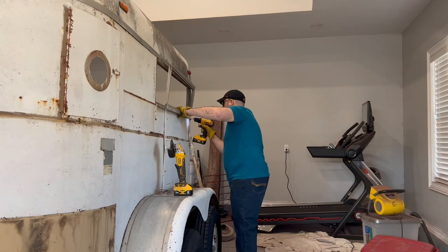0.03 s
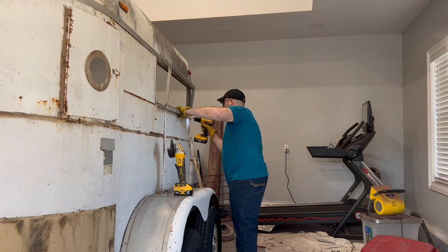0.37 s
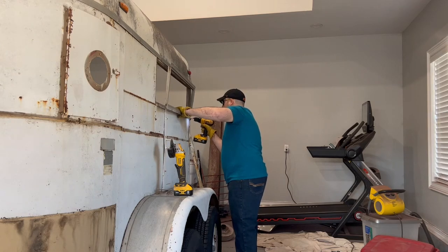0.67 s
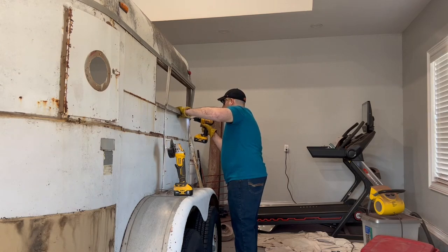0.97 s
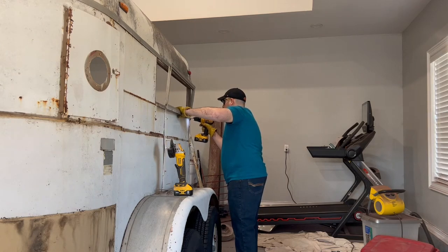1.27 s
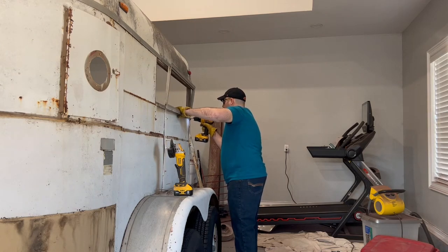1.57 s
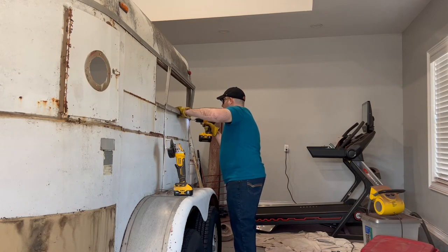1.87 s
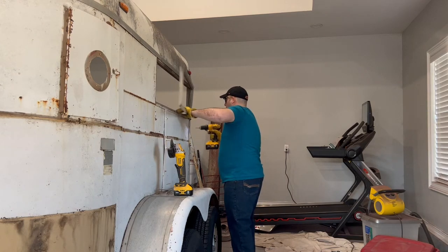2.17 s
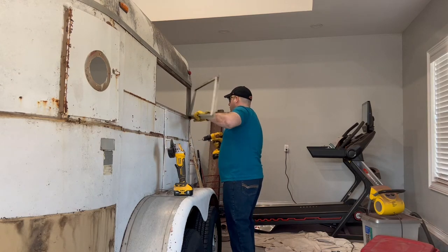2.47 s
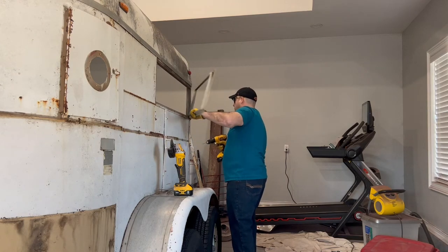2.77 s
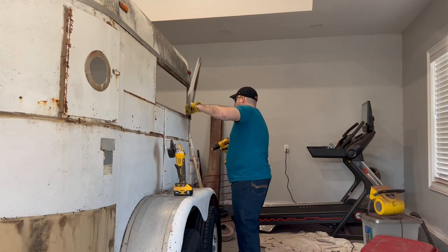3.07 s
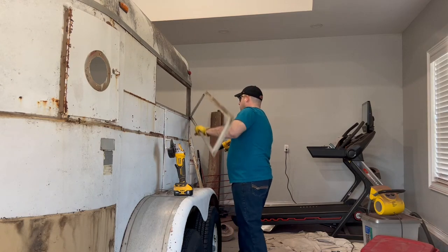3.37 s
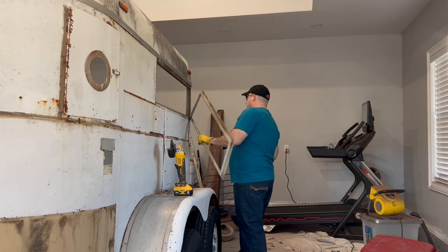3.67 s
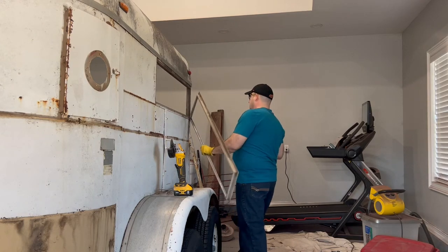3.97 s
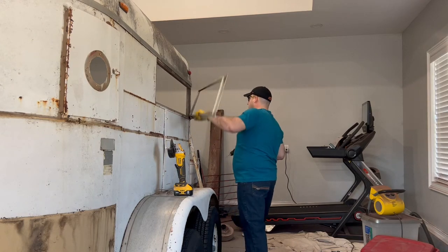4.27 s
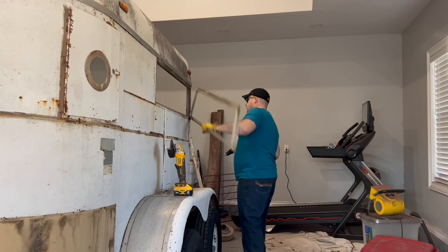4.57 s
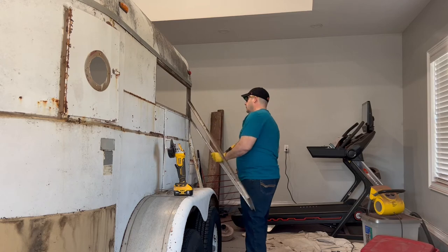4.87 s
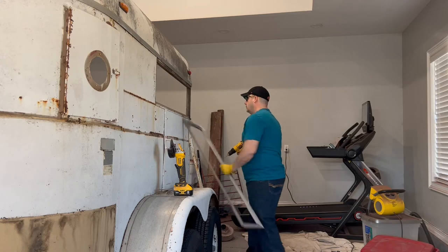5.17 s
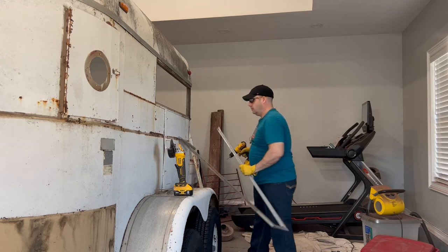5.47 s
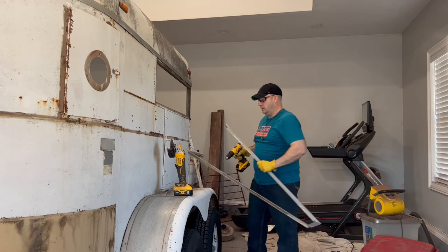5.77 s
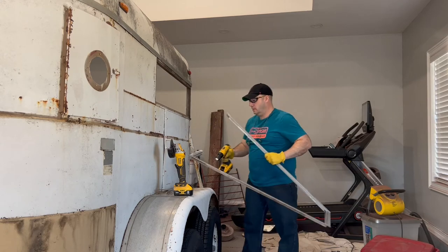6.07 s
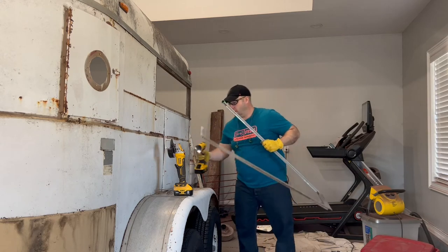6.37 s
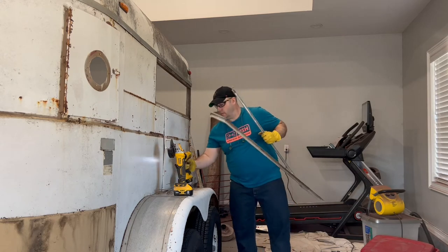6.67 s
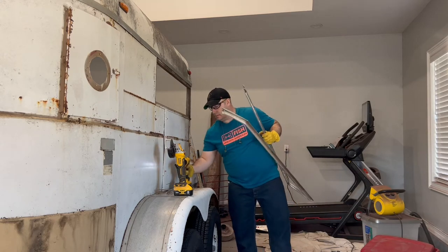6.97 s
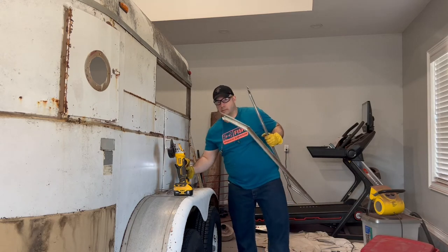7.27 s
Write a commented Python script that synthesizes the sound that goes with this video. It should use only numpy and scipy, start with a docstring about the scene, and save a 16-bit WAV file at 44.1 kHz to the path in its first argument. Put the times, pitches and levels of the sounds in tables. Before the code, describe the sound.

Four quick drill bursts, then metal trim is pulled off with knocks, scrapes, a clank and a crash, ending with a hollow thud.

```python
"""In a bare, echoing garage a cordless drill runs in four short bursts: its gears rattle, its motor
whines and its bit shakes a trailer's metal skin while grinding out a rivet. From about 2 s a thin metal
window frame is worked loose; impacts make it tick and thump, and friction makes it scrape. Near 4 s it
springs free with a clank, and a second later it crashes against the wall. Near 7 s the drill is stood
on the fender, whose modes answer with a hollow thud. Faint room air and electrical whistles persist."""
import sys
import numpy as np
from scipy import signal
from scipy.fft import rfft, irfft, next_fast_len
from scipy.io import wavfile
from scipy.ndimage import uniform_filter1d

SR = 44100
rng = np.random.default_rng(int(sys.argv[2]) if len(sys.argv) > 2 else 0)


def dump(signal):
    """Clip the signal to [-1, 1] and save it as 16-bit WAV at the path in sys.argv[1]."""
    limited = np.clip(np.atleast_2d(signal).T, -1, 1)
    pcm = np.round(limited * 32767).astype(np.int16)
    wavfile.write(sys.argv[1], SR, pcm)


N = 328104
T = np.arange(N) / SR

# Trigger pulls. Each row: start in seconds, time held in seconds, relative motor speed,
# relative level of the skin's rattle in dB.
TRIGGER_PULLS = [(.287, 0.1969, 0.99, -39), (0.677, 0.1626, 1.04, -36.5), (1.011, .19, 1.1, -37.5),
                 (1.368, 0.2049, 1.0, -38)]
# Knocks of the frame. Each row: start in seconds, frame level in dB, edge tick level in dB,
# tick pitch in Hz, chatter time in seconds.
FRAME_KNOCKS = [(1.942, -45.5, -29, 7000, 0.0278), (2.045, -30.5, -33, 8030, .05),
                (2.059, -24.5, -19, 7500, 0.0456), (2.087, -25.5, -24, 7936, 0.031),
                (2.112, -11.5, -12.5, 8400, 0.038), (2.29, -22.5, -27, 8900, 0.03),
                (2.544, -23, -19, 4140, 0.069), (2.77, -26.5, -22.5, 3200, 0.069),
                (2.877, -21, -16.5, 8200, 0.099), (2.949, -20, -17.5, 9550, 0.022),
                (3.14, -26, -24, 5510, 0.0405), (3.274, -33.5, -28.5, 4509, 0.045),
                (3.446, -23.5, -16.5, 7894, 0.063), (3.471, -28, -21.5, 3500, 0.049),
                (3.712, -19.5, -13, 12500, 0.0626), (3.771, -19.5, -20, 6050, 0.12),
                (3.942, -28, -25.5, 7486, 0.102), (4.034, -32, -27.5, 4622, 0.034),
                (4.597, -31, -17.5, 8000, .047), (4.63, -18.5, -29.5, 2910, 0.05),
                (4.885, -23, -18, 8000, 0.0265), (4.985, -15.5, -19, 8500, 0.0405),
                (5.062, -11, -13.5, 7509, 0.068), (5.117, 6, -9, 5698, 0.0484),
                (5.208, 0.5, 2, 8680, 0.0092), (5.602, -17, -15, 7690, 0.0229),
                (5.994, -29, -37, 3500, 0.1), (6.036, -32.5, -38, 2197, 0.0487)]
# Slides of the frame along the opening. Each row: start in seconds, length in seconds,
# relative scrape level in dB, relative wall rumble level in dB.
FRAME_SLIDES = [(2.239, .24, -72, -56), (2.603, 0.233, -65, -64.5), (2.895, 0.158, -66.5, -54.5),
                (3.136, 0.181, -62.5, -58.5), (3.448, 0.0713, -53.5, -67), (3.708, 0.124, -52, -69),
                (3.938, 0.123, -61.5, -68), (4.609, 0.136, -39.5, -51.5), (4.784, 0.036, -47, -47.5),
                (4.946, 0.27, -48, -67), (5.21, 0.263, -46.5, -50), (5.879, 0.175, -81, -66),
                (6.26, 0.19, -78.5, -80.5)]
# Impacts. Each row: start in seconds, level in dB, chatter time in seconds.
SEAT_BUMPS = [(2.118, -4, .02), (2.150, -6.5, .053), (2.225, -12.5, .013), (2.591, -22, .04),
              (2.949, -17.5, .04), (3.06, -27.5, .031), (4.66, -17.5, .08), (4.73, -23.5, .08)]  # the frame bumps the skin around its seat
RELEASE_CLANKS = [(4.073, 6.5, 0.011), (4.087, -4, 0.0095), (4.144, -3, 0.023)]  # the frame springs off the last rivet
FENDER_LANDINGS = [(6.856, -22.5, .018), (6.894, 4, 0.0174), (6.913, -0.5, 0.0218), (6.997, -2, 0.031),
                   (7.041, -13, 0.026), (7.10, -20.5, 0.0306), (7.177, -13.5, 0.0194)]  # the drill lands and rocks

# Broad spectra. Each row: frequency in Hz, relative spectral density in dB.
GEAR_SPECTRUM = [(300, 5), (1000, 10.5), (2200, 0.5), (3000, -1), (4700, 1.5), (6200, -5.5), (7800, -8),
                 (8800, -7), (9800, -9), (12000, -15), (15500, -28)]
RASP_SPECTRUM = [(2000, -17.5), (6000, -2.5), (7800, -2), (8800, 3), (9800, -5.5), (12000, -9),
                 (15500, -15.5)]  # dry rasp of the gear teeth
SKIN_SPECTRUM = [(28, -32.5), (43, -6), (62, -35), (86, 1.5), (105, -6.5), (145, 3), (205, -6), (280, 3),
                 (450, -5), (750, -6.5), (1200, -22), (2000, -13.5), (5000, -41.5)]  # the skin's response to the bit
FRAME_SPECTRUM = [(150, -28), (600, -10.5), (1200, -6), (2100, -1), (3000, -7), (4500, -9), (7000, -17.5),
                  (10000, -28.5), (15000, -28.5)]
EDGE_SPECTRUM = [(500, -29), (1800, -11.5), (3000, 0), (4300, 0), (5500, -0.5), (8700, -1), (10000, -5.5),
                 (15500, -15)]  # the edge of the frame that touches
WALL_SPECTRUM = [(25, -25.5), (45, -8.5), (70, -6.5), (125, -4), (165, -4.5), (240, 2.5), (400, -4),
                 (650, -7), (1000, -18), (2000, -21.5), (6000, -43)]
SEAT_SPECTRUM = [(50, -11), (140, -13.5), (250, 0.5), (420, -6), (700, -7), (1100, -10), (1600, -22),
                 (3000, -30), (8000, -45.5)]  # the skin around the window
BENT_FRAME_SPECTRUM = [(60, -32), (200, -15.5), (290, -9), (450, -13), (680, -15.5), (820, -10), (1200, -6),
                       (1550, -4.5), (2300, -13), (4000, -18.5), (7600, -16), (10000, -23), (15500, -31.5)]
SCRAPE_SPECTRUM = [(120, -9), (400, 2), (850, 5), (1200, -0.5), (1900, -1.5), (3000, -5.5), (5500, -5.5),
                   (8800, -7), (11000, -17.5), (15500, -23)]
FENDER_SPECTRUM = [(25, -14.5), (60, -13.5), (130, -5), (210, -3.5), (420, 1), (700, -6.5), (1300, -11),
                   (2400, -20.5), (4500, -25.5), (8500, -30.5), (11000, -44.5), (15500, -53.5)]
AIR_SPECTRUM = [(12, -37), (20, -14), (45, -9), (86, -10.5), (123, -5.5), (146, -18), (234, -17),
                (388, -31.5), (472, -24), (825, -33.5), (1810, -35), (6910, -44), (7520, -43), (13000, -48),
                (16000, -57)]  # still air of the room

# Heavily damped resonances. Each row: centre in Hz, width in Hz, lift in dB at a depth of one.
GEARBOX_PEAKS = [(665.5, 21.8, 9), (871, 55, 3.2), (1589, 120, 3.94), (2487, 114, 3.9), (2900, 326, 4.1),
                 (3610, 250, 3.7), (4435, 203, 3.33), (4840, 98, 4.8), (5280, 224, 4.2), (5530, 106, 3.7),
                 (5830, 147, 2.4), (6700, 93, 1.6), (7230, 150, 6.9), (8650, 176, 5.2), (8710, 106, 6),
                 (10100, 184, 3.0)]
FRAME_PEAKS = [(904, 130, 2.5), (1460, 72, 5), (1813, 200, 3), (1994, 39, 0.5), (2269, 105, 4),
               (2525, 41, 5), (3050, 270, 4), (3466, 120, 3.5), (3917, 132, 1.5), (3804, 41, 3.5),
               (4408, 110, 2.5), (4976, 125, 5.5), (5660, 85, 6), (5960, 64, 3), (6305, 70, 4),
               (6693, 72, 1.5), (7560, 166, 3.5), (8542, 170, 3), (8910, 148, 3), (9523, 107, 3),
               (10614, 73, 2), (11280, 149, 4)]
BENT_FRAME_PEAKS = [(807, 55, 4.5), (1210, 140, 4.8), (1538, 230, 4.3), (1717, 54, 5.4), (2860, 139, 3.4),
                    (3130, 143, 4.8), (3660, 161, 4.6), (4250, 100, 5.2), (5100, 200, 3.2),
                    (5890, 180, 3.8), (6761, 166, 4.3), (7270, 156, 4.1), (7860, 200, 4.2),
                    (8450, 192, 5.3)]

# Prominent normal modes. Each row: frequency in Hz, relative level in dB, 60 dB decay time in seconds.
SKIN_MODES = [(138, -25.5, 0.42), (169, -5.5, 0.42), (315.1, -2, 0.138), (561, -10, 0.324), (672, 9, 0.32),
              (797.3, 5, 0.091)]
FRAME_MODES = [(891, -4.5, 0.45), (1007.6, -3.5, .6), (1343, -0.5, 0.745), (1744, 3, 1), (1850, -4.5, 0.35),
               (2277, -1.5, .5), (2670, 3, .7), (3890, -7, 0.37), (4140, -9, .5), (4700, -25.5, .6),
               (5180, -7.5, .6), (6165, -13, .7), (7560, -15, .3), (8380, -12.5, .3)]
WALL_MODES = [(233.3, -7, 1.0), (250.3, 2.5, 0.83), (270.2, 5, .8), (303, -6, 0.64), (397.6, -8, 0.7),
              (496.3, -5, 0.79), (577.7, -4, .4), (695.3, -7.5, 0.46)]
SEAT_MODES = [(241, -6.5, 0.59), (394.4, 3, 0.977), (398.9, 1, 0.22), (488.2, -4, 1), (663.3, -12, 0.44),
              (786, -6, .6), (1524, -10.5, 0.15)]
BENT_FRAME_MODES = [(815, -6.5, 0.98), (1189, -7, 0.48), (1332.3, -13, .2), (1432, -8.5, .2),
                    (1539, -7, .3), (1650, -4, 0.29), (3660, -18, .2), (7170, -10, .15)]
FENDER_MODES = [(139.2, -1.5, 0.45), (216.5, 3, 0.39), (229.9, 9.5, 0.16), (322, -10, 0.33),
                (400.2, -5, 0.27), (460, -13.5, .4), (1010, -19, .4), (1080, -21.5, 0.26), (1415, -10, .4)]

# Reverberation of the garage. Each row: frequency in Hz, 60 dB decay time in seconds.
GARAGE_DECAY = [(60, 2.5), (250, 1.31), (600, 1.213), (1500, 1.016), (4000, 0.88), (8000, 0.614),
                (14000, 0.462)]
# Faint electrical whistles. Each row: frequency in Hz, level in dB.
ELECTRICAL_TONES = [(3058, -96.5), (8947, -103), (9830, -107)]


def drill(rotor_hz=108, throb=0.315, gears_db=-39, grind_db=-3, hum_hz=84.75, hum_db=-14, buzz_db=-13):
    """Forced vibration: tooth and chip impacts, modulated by the rotor, drive the gearbox and skin."""
    speed, bite = motor()
    angle = 2 * np.pi * np.cumsum(rotor_hz * np.sqrt(speed)) / SR
    load = 1 + throb * np.cos(angle) + throb * np.cos(2 * angle)
    teeth = grains(per_s=5000, spread_db=3) * load
    gears = unit_power(colour(teeth, peaked(GEAR_SPECTRUM, GEARBOX_PEAKS, depth=1.34)))
    chips = grains(per_s=1500, spread_db=2.5) * load
    buzz = from_db(buzz_db) * unit_power(convolve(chips, ringing(SKIN_MODES)))
    skin = unit_power(colour(chips, SKIN_SPECTRUM)) + buzz
    hum = from_db(hum_db) * np.sin(2 * np.pi * hum_hz * T)  # a low panel mode under the bit
    return from_db(gears_db) * speed * gears + from_db(grind_db) * bite * (skin + hum)


def motor(spin_up_s=0.075, coast_s=0.065, stall_speed=0.070716, bite_exponent=0.673):
    """First-order lag: speed builds on a pull, then friction stops it; bite follows by a power law."""
    speed, bite = np.zeros(N), np.zeros(N)
    for start, held, top_speed, bite_db in TRIGGER_PULLS:
        spun_up = 1 - np.exp(-np.clip(T - start, 0, held) / spin_up_s)
        coasting = np.exp(-np.maximum(T - start - held, 0) / coast_s)
        turning = spun_up * np.maximum((1 + stall_speed) * coasting - stall_speed, 0)
        speed += top_speed * turning
        bite += from_db(bite_db) * turning ** bite_exponent
    return speed, bite


def gear_rasp(level_db=-44, lead_s=0.021):
    """Tooth contact noise grows with torque, which follows both speed and acceleration."""
    speed, _ = motor()
    acceleration = uniform_filter1d(np.gradient(speed) * SR, size=200)
    torque = np.maximum(speed + lead_s * acceleration, 0)
    teeth = grains(per_s=3500, spread_db=3.5)
    return from_db(level_db) * torque * unit_power(colour(teeth, RASP_SPECTRUM))


def motor_whine(start_hz=3200, rise_hz=1160, full_speed=0.85, waver=0.00672, level_db=-49,
                lower_ratio=0.83, lower_db=-5, chirp_hz=3950, chirp_db=-50, chirp_s=0.0256):
    """Rotation tones climb with speed and level off; the first pull opens with a short chirp."""
    speed, _ = motor()
    pitch = (start_hz + rise_hz * np.minimum(speed / full_speed, 1)) * (1 + waver * wander(200))
    phase = 2 * np.pi * np.cumsum(pitch) / SR
    tones = np.sin(phase) + from_db(lower_db) * np.sin(lower_ratio * phase)
    chirp_swell = np.sin(np.pi * np.clip((T - TRIGGER_PULLS[0][0]) / chirp_s, 0, 1))
    chirp = from_db(chirp_db) * chirp_swell * np.sin(2 * np.pi * chirp_hz * T)
    return from_db(level_db) * np.sqrt(speed) * tones + chirp


def frame_knocks(tick_lift_db=4.5, tick_octaves=0.2, wall_share_db=-3.5, wall_growth=1.238):
    """Impact excitation: frame and edge ring; harder knocks start faster and shake the wall more."""
    out = np.zeros(N)
    frame_spectrum = peaked(FRAME_SPECTRUM, FRAME_PEAKS, depth=0.58)
    hz, edge_shape = peaked(EDGE_SPECTRUM, FRAME_PEAKS, depth=0.71).T
    for start, frame_db, edge_db, tick_hz, chatter_s in FRAME_KNOCKS:
        lift = tick_lift_db * np.exp(-(np.log2(hz / tick_hz) / tick_octaves) ** 2)
        edge_spectrum = np.column_stack([hz, edge_shape + lift])
        softness = np.interp(frame_db, [-18, 0], [0.91, 0.47])  # light knocks slide in
        thud = impact(WALL_SPECTRUM, chatter_s, wash_t60=0.4, wash_db=1, modes=WALL_MODES, modes_db=-6.5)
        ring = impact(frame_spectrum, chatter_s, wash_t60=0.11, wash_db=-0.5,
                      modes=FRAME_MODES, modes_db=-15, softness=softness)
        tick = impact(edge_spectrum, chatter_s, wash_t60=0.086, wash_db=-6, softness=softness)
        add(out, start, from_db(wall_share_db + wall_growth * frame_db) * thud)
        add(out, start, from_db(frame_db) * ring)
        add(out, start, from_db(edge_db) * tick)
    return out


def release_clank():
    """Sudden release of strain: the bent frame lets go and vibrates freely."""
    spectrum = peaked(BENT_FRAME_SPECTRUM, BENT_FRAME_PEAKS, depth=0.94)
    return impacts(RELEASE_CLANKS, spectrum, wash_t60=0.07, wash_db=4.5,
                   modes=BENT_FRAME_MODES, modes_db=-14.5)


def corner_crack(start=5.2083, level_db=-1, chatter_s=0.0068):
    """A brief contact has a wide spectrum: a corner of the falling frame cracks against metal."""
    bright = [(1150, -25), (2300, 0), (6000, -3), (12000, -3), (15500, 0)]  # Hz, dB
    return impacts([(start, level_db, chatter_s)], bright, wash_t60=0.026, wash_db=-16)


def seat_thumps():
    """Panel resonance: the skin around the window thumps as the frame comes unstuck."""
    return impacts(SEAT_BUMPS, SEAT_SPECTRUM, wash_t60=0.15, wash_db=5, modes=SEAT_MODES, modes_db=-1.5)


def fender_thud():
    """Shell resonance: the drill's battery lands heel first and rocks on the hollow fender."""
    return impacts(FENDER_LANDINGS, FENDER_SPECTRUM, wash_t60=0.182, wash_db=3.5,
                   modes=FENDER_MODES, modes_db=-6, softness=0.369)


def frame_scrape(scrape_db=5, rumble_db=-2, clump_db=2, attack_s=0.026, release_s=0.032):
    """Stick-slip friction: clumps of tiny slips ring the sliding frame while the wall rumbles."""
    rub = np.zeros(N)
    shake = from_db(-55.5) * decay(t60=0.344, size=N)  # the wall is still settling at the start
    for start, length, rub_db, wall_db in FRAME_SLIDES:
        swell = np.clip((T - start) / attack_s, 0, 1)
        pressure = swell * np.exp(-np.maximum(T - start - length, 0) / release_s)
        rub += from_db(rub_db) * pressure
        shake += from_db(wall_db) * pressure
    clumps = from_db(clump_db * np.clip(wander(500), -2, 2))
    slips = unit_power(grains(per_s=940, spread_db=4) * clumps) * rub
    scrape = colour(slips, peaked(SCRAPE_SPECTRUM, FRAME_PEAKS, depth=1.3))
    rumble = unit_power(colour(grains(per_s=600, spread_db=1.5), WALL_SPECTRUM)) * shake
    return from_db(scrape_db) * scrape + from_db(rumble_db) * rumble


def frame_creak(start=2.6, end=2.92, pitch_hz=735, level_db=-60, waver=0.06):
    """The twisted frame squeals faintly; random frequency modulation makes the tone unsteady."""
    pitch = pitch_hz * (1 + waver * wander(300))
    progress = np.clip((T - start) / (end - start), 0, 1)
    swell = np.sqrt(np.maximum(np.sin(np.pi * progress), 0))
    return from_db(level_db) * swell * np.sin(2 * np.pi * np.cumsum(pitch) / SR)


def impacts(events, spectrum, **body):
    """Superposition: successive impacts on one body add up."""
    out = np.zeros(N)
    for start, db, chatter_s in events:
        add(out, start, from_db(db) * impact(spectrum, chatter_s, **body))
    return out


def impact(spectrum, chatter_s, wash_t60, wash_db, modes=(), modes_db=0, softness=0.27, size=8192):
    """Transient response: a chattering contact excites a wash of crowded resonances and any modes."""
    contact = unit_energy(spiky_noise(size) * decay(chatter_s, size))
    wash = from_db(wash_db) * unit_energy(rng.standard_normal(size) * decay(wash_t60, size))
    onset = 1 - decay(softness * chatter_s, size)
    force = whiten((contact + wash) * onset ** 2, width_hz=60)
    sound = np.pad(unit_energy(colour(force, spectrum)), (0, SR - size))
    return unit_energy(sound + from_db(modes_db) * ringing(modes)) if modes else sound


def ringing(modes, size=SR):
    """Free vibration: each mode is a damped sine, excited a little differently every time."""
    impulse, out = signal.unit_impulse(size) + 1e-18, np.zeros(size)
    for hz, db, t60 in modes:
        radius, angle = np.exp(-np.log(1000) / (t60 * SR)), 2 * np.pi * hz / SR
        gain = from_db(db + rng.normal(0, 2)) * np.sign(rng.normal()) / np.sqrt(t60)
        feedback = [1, -2 * radius * np.cos(angle), radius * radius]
        out += signal.lfilter([0, gain * np.sin(angle)], feedback, impulse)
    return unit_energy(out)


def garage(x, early_db=-4, early_t60=0.069, late_db=1, gap_s=0.0022, size=2 * SR):
    """Reverberation: direct sound, early reflections, then a diffuse tail whose treble dies first."""
    hz = np.arange(size // 2 + 1) * SR / size
    white = rfft(rng.standard_normal(size))
    octaves = np.log2(np.clip(hz, 40, 40 * 2 ** 8.5) / 40)
    tail = 0
    for k in range(18):  # half-octave bands from 40 Hz up
        band = irfft(white * np.maximum(1 - abs(2 * octaves - k), 0), size)
        tail = tail + band * decay(at_hz(GARAGE_DECAY, 40 * 2 ** (k / 2)), size)
    early = spiky_noise(size) * decay(early_t60, size)
    arrived = np.clip(T[:size] / gap_s - 0.5, 0, 1)
    response = from_db(early_db) * unit_energy(early * arrived)
    response += from_db(late_db) * unit_energy(tail * arrived)
    response[0] += 1  # direct sound
    return convolve(x, whiten(response, width_hz=60))


def room_tone(air_db=-68.5):
    """Stationary background: broadband air noise and pure electrical tones."""
    air = from_db(air_db) * unit_power(colour(rng.standard_normal(N), AIR_SPECTRUM))
    whistles = sum(from_db(db) * unit_power(np.sin(2 * np.pi * hz * T)) for hz, db in ELECTRICAL_TONES)
    return air + whistles


def grains(per_s, spread_db):
    """Shot noise: random impulses of uneven size, at unit power."""
    sizes = from_db(spread_db * np.minimum(rng.exponential(1, N), 4)) * rng.choice([-1, 1], N)
    return unit_power(sizes * (rng.random(N) < per_s / SR))


def spiky_noise(size):
    """Cubing gathers the energy of noise into scattered spikes."""
    return rng.standard_normal(size) ** 3


def wander(samples):
    """A moving average turns noise into a slow fluctuation of unit power."""
    return unit_power(uniform_filter1d(rng.standard_normal(N), size=samples))


def peaked(spectrum, peaks, depth):
    """Resonance curves, scaled by depth, stand on a broad spectrum."""
    hz = np.geomspace(20, SR / 2, num=1500)
    lift = sum(db / (1 + (2 * (hz - centre) / width) ** 2) for centre, width, db in peaks)
    return np.column_stack([hz, at_hz(spectrum, hz) + depth * lift])


def whiten(x, width_hz):
    """Inverse filtering levels the smoothed spectrum and keeps its fine ripple."""
    size = next_fast_len(len(x))
    power = uniform_filter1d(abs(rfft(x, size)) ** 2, size=max(int(width_hz * size / SR), 1))
    hz = np.arange(len(power)) * SR / size + 1
    inverse_db = -10 * np.log10(np.maximum(power, 1e-12))
    return unit_energy(colour(x, np.column_stack([hz, inverse_db])))


def colour(x, spectrum, size=8192):
    """Minimum-phase filtering: nothing sounds before its cause."""
    hz = np.arange(size // 2 + 1) * SR / size
    cepstrum = irfft(np.log(from_db(at_hz(spectrum, hz))))
    cepstrum[0] /= 2
    response = irfft(np.exp(rfft(2 * cepstrum[:size // 2], size)))
    return convolve(x, response)


def convolve(x, response):
    """Convolution passes a sound through a linear system."""
    return signal.oaconvolve(x, response)[:len(x)]


def add(out, start, sound):
    """Superpose a sound at a start time in seconds."""
    first = round(start * SR)
    out[first:first + len(sound)] += sound[:N - first]


def decay(t60, size):
    """Exponential damping by 60 dB in t60 seconds."""
    return np.exp(-np.minimum(np.log(1000) * T[:size] / max(t60, 1e-4), 40))


def at_hz(points, hz):
    """Interpolation on a log-frequency axis."""
    frequencies, values = np.transpose(points)
    return np.interp(np.log(np.maximum(hz, 1)), np.log(frequencies), values)


def from_db(db):
    """Decibels to amplitude ratio."""
    return 10 ** (np.asarray(db) / 20)


def unit_power(x):
    """Normalise the mean square."""
    return x / np.sqrt(np.mean(x ** 2) + 1e-20)


def unit_energy(x):
    """Normalise the sum of squares."""
    return x / np.sqrt(np.sum(x ** 2) + 1e-20)


def scene(work_db=0.9861, crack_room_db=-3):
    """Sound from three places, each with its own reflections, superposes at one listening point."""
    crack = corner_crack()
    at_rivet = garage(drill() + gear_rasp() + motor_whine() + seat_thumps())
    at_frame = garage(frame_knocks() + from_db(crack_room_db) * crack + frame_scrape() + frame_creak())
    at_side = garage(release_clank() + fender_thud())
    work = at_rivet + at_frame + crack + at_side
    return np.tile(from_db(work_db) * work + room_tone(), (2, 1))


def record(dry, cutoff_hz=15800):
    """An elliptic low-pass filter cuts the highest treble steeply."""
    return signal.sosfilt(signal.ellip(10, 0.1, 80, cutoff_hz, fs=SR, output="sos"), dry)


dry = scene()
out = record(dry)
dump(out)
```